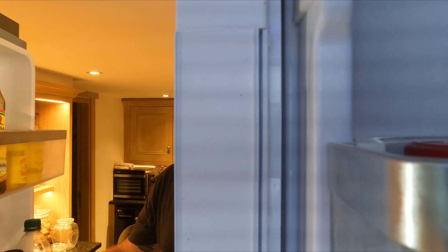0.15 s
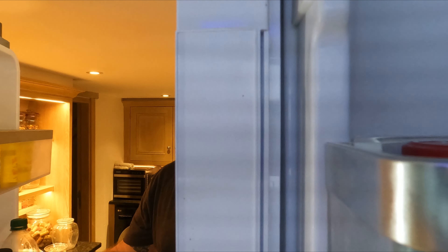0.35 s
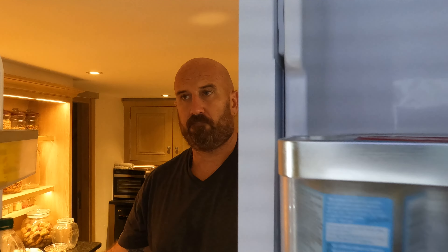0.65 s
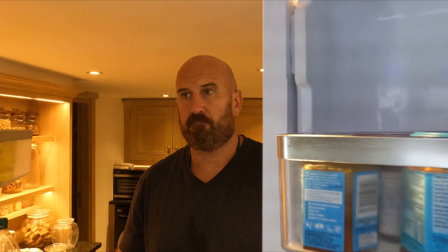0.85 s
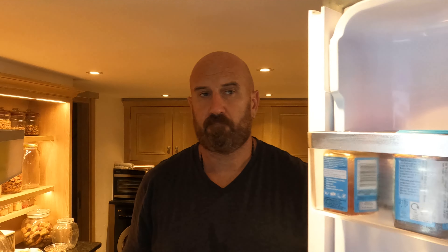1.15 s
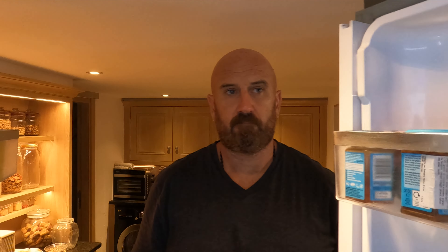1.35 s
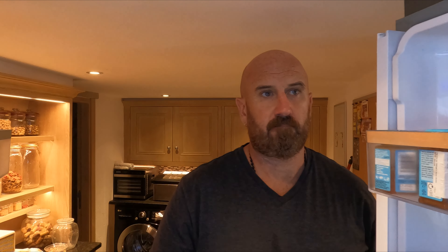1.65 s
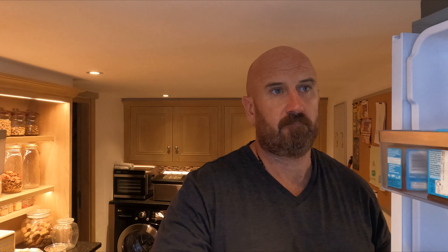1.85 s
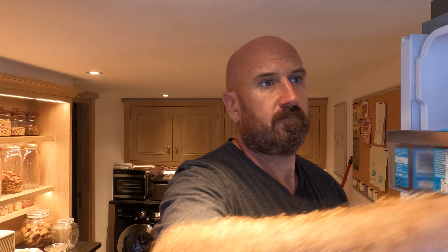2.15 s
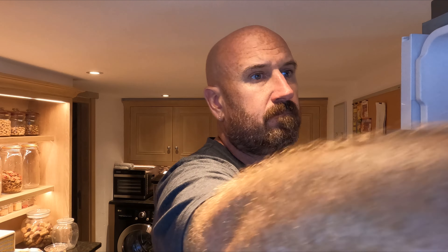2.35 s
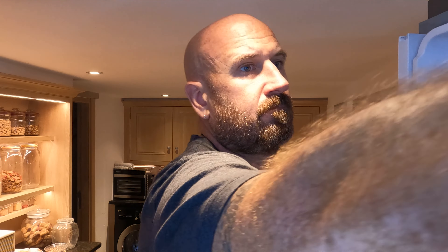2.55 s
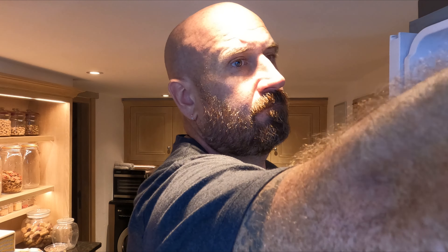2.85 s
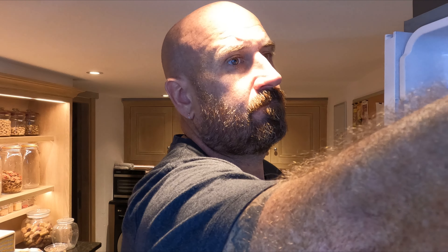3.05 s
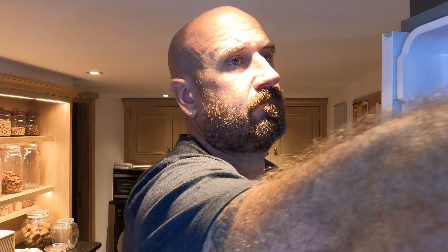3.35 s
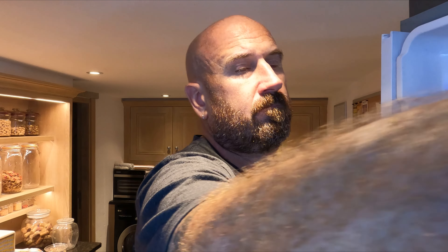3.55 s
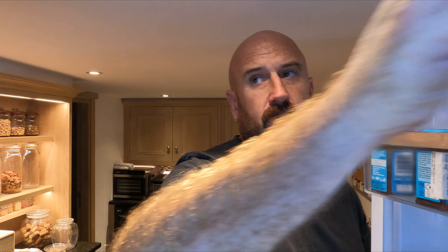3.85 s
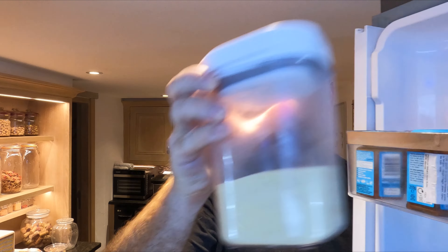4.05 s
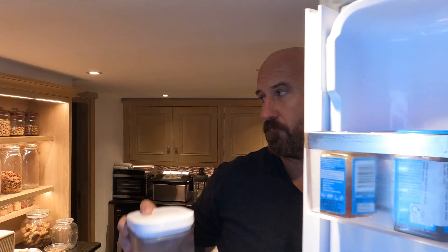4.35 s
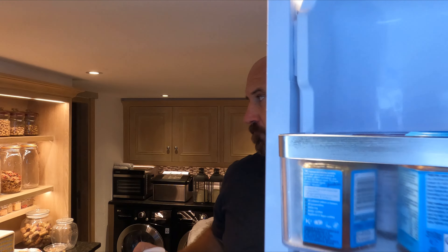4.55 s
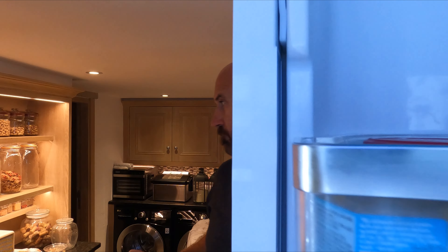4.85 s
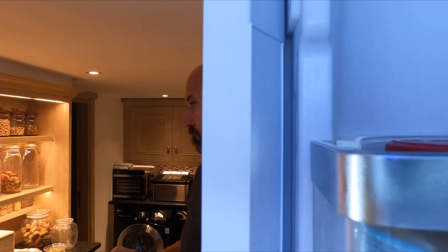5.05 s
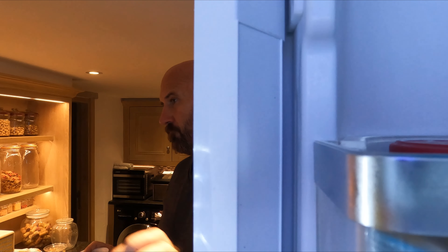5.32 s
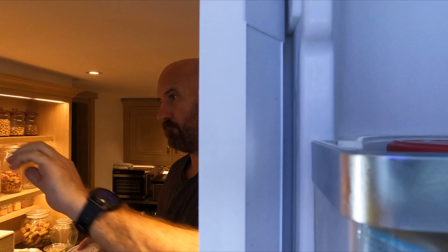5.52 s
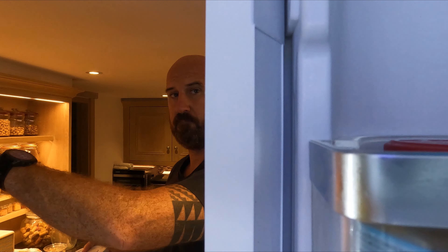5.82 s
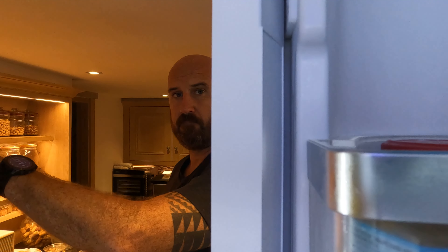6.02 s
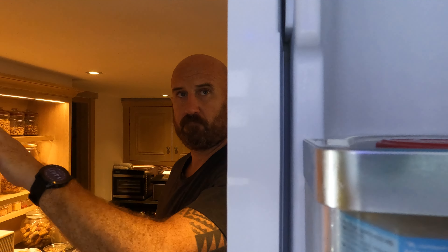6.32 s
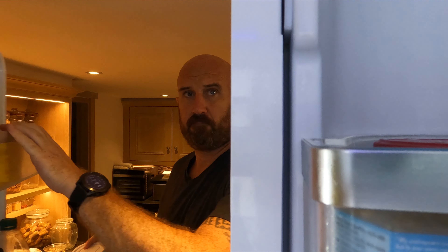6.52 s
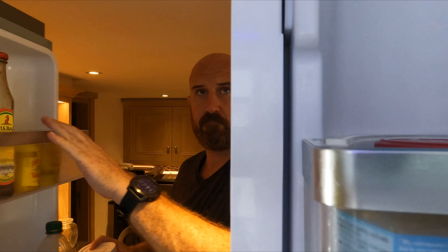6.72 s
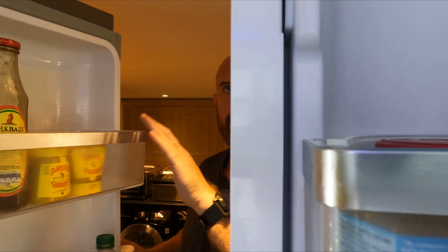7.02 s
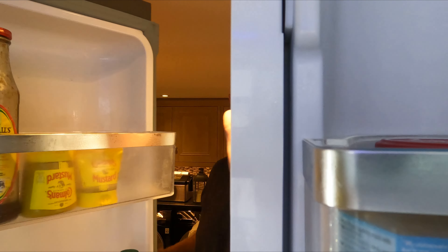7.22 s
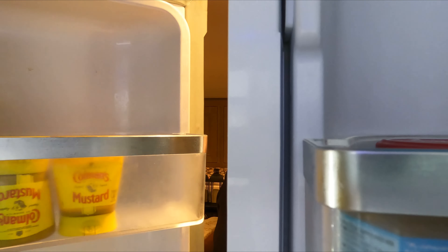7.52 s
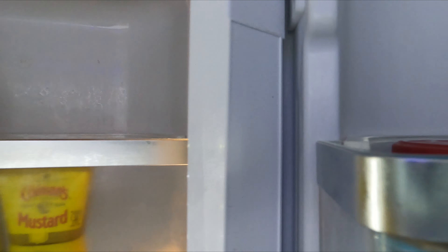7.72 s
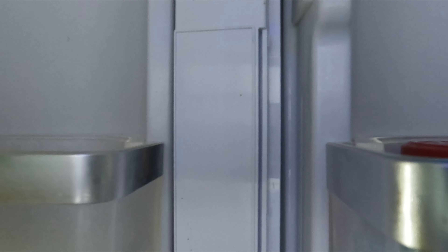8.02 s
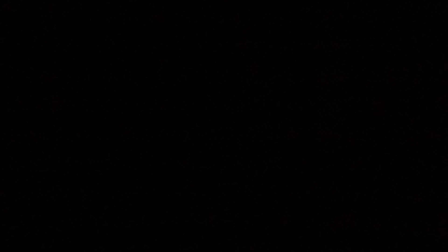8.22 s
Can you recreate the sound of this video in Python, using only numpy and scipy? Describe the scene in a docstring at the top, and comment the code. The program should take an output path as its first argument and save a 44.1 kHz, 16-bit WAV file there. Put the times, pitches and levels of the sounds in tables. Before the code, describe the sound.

Heard from a shelf inside a refrigerator in a home kitchen: seals rip open with a low shudder and sharp snaps, then faint joggling. An arm brushes in, a plastic container knocks, scrapes and thumps hollowly as it is lifted out. One door shuts with a thud and brief creak, jars joggle, then the other door whooshes and slams with rattling cracks over a soft fan murmur.

```python
"""Inside a refrigerator, heard from a shelf: the door seals peel open, an arm reaches in, a plastic tub is
knocked about and lifted out, jars joggle in the door racks and both doors swing shut over a murmuring fan.
Random pushes and contacts ring the modes of the boxed air and shelves; coloured noise makes the rasps, snaps,
cloth and moving air; decaying sines make the clinks and the hinge, steady sines the shudder of the door."""
import sys
import numpy as np
from scipy import signal
from scipy.fft import rfft, irfft, next_fast_len
from scipy.io import wavfile
from scipy.ndimage import uniform_filter1d

SR = 44100
rng = np.random.default_rng(int(sys.argv[2]) if len(sys.argv) > 2 else 0)


def output_pcm(signal):
    """Save a mono or channel-first signal as 16-bit PCM at the path in sys.argv[1].

    Samples are clipped to [-1, 1] before scaling.
    """
    pcm = np.clip(np.atleast_2d(signal).T, -1, 1) * 32767
    wavfile.write(sys.argv[1], SR, np.round(pcm).astype(np.int16))


N = 369558
TIME = np.arange(N) / SR

# Deep modes of the cabinet. Each row: pitch in Hz, level in dB, t60 relative to the ring of the blow.
DEEP_MODES = [(116.9, 1.5, 1.12), (136.8, 3, 1.43), (173.3, 4.5, 1.32), (247.3, -5, 1.13)]
# Modes of the cabinet air and shelves. Each row: pitch in Hz, level in dB, t60 relative to the ring of the blow.
BOX_MODES = [(275.5, -13, 1.8), (360.5, -0.5, 1.52), (391, -5, 1.48), (420.4, -1, 1.03), (464.7, -3, 1.5),
             (531.2, 2.5, 1.05), (614.4, 3.5, 0.52), (661, -6.5, 1.67), (710.6, -3.5, 1.4),
             (793.3, 2, 0.47), (888, -5, 0.83), (1116, -9, 0.46), (1190, -19.5, 0.074), (1455, -24, 0.74)]
# Colour of cracks and rasps. Each row: frequency in Hz, relative level in dB per Hz.
BRIGHT_COLOUR = [(590, -25.5), (1000, -2), (1140, -9), (1320, -11), (2800, -10.5), (4930, -17),
                 (7180, -25.5), (9050, -41.5), (11300, -37), (14100, -70)]


def undb(db):
    """Turns dB into gain."""
    return 10 ** (np.asarray(db) / 20)


def unit(x):
    """Scales x to an RMS of one."""
    return x / np.sqrt(np.mean(x ** 2))


def colour(x, points):
    """Shapes the spectrum of x by (Hz, dB) points."""
    hz, db = np.transpose(points)
    size = next_fast_len(len(x))
    f = np.maximum(np.arange(size // 2 + 1) * SR / size, 1)
    gain = undb(np.interp(np.log(f), np.log(hz), db))
    return irfft(rfft(x, size) * gain, size)[:len(x)]


def tilted(db_an_octave):
    """The bright colour, tipped about 3 kHz."""
    return [(hz, db + db_an_octave * np.log2(hz / 3000)) for hz, db in BRIGHT_COLOUR]


def band(x, lo_hz, hi_hz):
    """Keeps one band of x, at an RMS of one."""
    return unit(signal.sosfilt(signal.butter(2, [lo_hz, hi_hz], "bandpass", fs=SR, output="sos"), x))


def curve(table, column=1, off_db=-120):
    """Gain along one column of dB, smoothed over 5 ms, dropping to off_db outside the table."""
    rows = np.transpose(table)
    gain = undb(np.interp(TIME, rows[0], rows[column], off_db, off_db))
    return uniform_filter1d(gain, size=SR // 200)


def swell(s, db, rise_s, fall_s, held_s=0, droop_db=0):
    """Gain that climbs 30 dB per rise_s to db at s, shifts by droop_db while held, then falls 30 dB per fall_s."""
    corners = np.cumsum([s - 4 * abs(rise_s), 4 * abs(rise_s), abs(held_s) + 1e-4, 4 * abs(fall_s)])
    level_db = np.interp(TIME, corners, db + np.array([-120, 0, droop_db, droop_db - 120]))
    return undb(level_db)


def add(out, s, x, db):
    """Lays x into out from time s with its peak at db."""
    i = int(s * SR)
    x = x[:N - i]
    out[i:i + len(x)] += x * undb(db) / np.max(np.abs(x))


def ring(modes, stretch, spread_db=0, near_hz=None, size=SR // 3, count=1):
    """Blows on decaying sine modes, each woken by chance; those near the pitch of the blow most."""
    hz, db, t60 = np.transpose(modes)
    if near_hz is not None:
        db = db - 9 * np.abs(np.log2(hz / np.reshape(near_hz, (-1, 1))))  # 9 dB weaker per octave away
    t = np.arange(size) / SR
    chance = rng.standard_normal((count, len(modes), 2))
    strength = undb(db + spread_db * chance[..., 0]) * np.sign(chance[..., 1])
    fade = np.exp(-np.log(1000) * t / np.maximum(t60 * stretch, 1e-3)[:, None])
    return np.squeeze(strength @ (fade * np.sin(2 * np.pi * hz[:, None] * t)))


def grains(per_s, spread_db):
    """Sparse random pushes, mostly small, a few larger."""
    chance = rng.random((N, 3)).T
    size_db = spread_db * np.minimum(-np.log(1 - chance[2]), 3)
    return unit((chance[0] < per_s / SR) * np.sign(chance[1] - .5) * undb(size_db))


def grit(per_s, spread_db, rattle_s):
    """Bright noise that jumps with each grain and dies away between the hard walls."""
    jumps = signal.lfilter([1], [1, -np.exp(-1 / (rattle_s * SR))], grains(per_s, spread_db) ** 2)
    return unit(colour(rng.standard_normal(N) * np.sqrt(np.maximum(jumps, 0)), BRIGHT_COLOUR))


def shaken(judder, upper, rumble, bumps_per_s, heaves_per_s, ring_s, boom_s, spread_db, push_s):
    """Ragged random pushes drive the lower and upper modes of the box and its deep modes, which ring on."""
    half = len(BOX_MODES) // 2
    low, high = ring(BOX_MODES[:half], ring_s), ring(BOX_MODES[half:], ring_s)
    deep = ring(DEEP_MODES, boom_s)
    bumps = np.abs(grains(bumps_per_s, spread_db))
    pressure = signal.fftconvolve(bumps, np.hanning(int(push_s * SR)), "same")
    push = unit(pressure * rng.standard_normal(N))
    heave = grains(heaves_per_s, spread_db)
    size = np.linalg.norm(low + high)
    lower_part = signal.fftconvolve(judder * push, low / size)[:N]
    upper_part = signal.fftconvolve(upper * push, high / size)[:N]
    deep_part = signal.fftconvolve(rumble * heave, deep / np.linalg.norm(deep))[:N]
    return lower_part + upper_part + deep_part


def fan():
    """A steady murmur of coloured noise, and a thin hiss of air that comes and goes."""
    # Colour of the murmur. Each row: frequency in Hz, relative level in dB per Hz.
    fan_colour = [(15, -64), (25, -36), (156, -16), (294, -5.5), (426, 15.5), (744, -3.5), (827, 10),
                  (944, -6.5), (1520, -7.5), (4630, -24), (11100, -54), (14100, -60)]
    # Hiss of air. Each row: time in seconds, level in dB before its drift.
    hiss_levels = [(0.0, -65.5), (.8, -73), (1.3, -68), (3.5, -74), (5.6, -69), (6.7, -65.5), (7.19, -61.5),
                   (7.3, -70), (8.38, -74)]
    murmur = undb(-51.5) * unit(colour(rng.standard_normal(N), fan_colour))
    drift_db = 2 * band(rng.standard_normal(N), 2, 8)
    hiss = curve(hiss_levels) * undb(drift_db) * band(rng.standard_normal(N), 4310, 5240)
    return murmur + hiss


def stir():
    """Small things joggling in the racks push on the cabinet all through."""
    # Each row: time in seconds, level of the joggle in dB.
    stir_levels = [(0.0, -50), (0.65, -44.5), (0.85, -55.5), (1.37, -55.5), (2.6, -43.5), (3.29, -47),
                   (4.9, -53), (5.65, -52.5), (6.33, -42.5), (7.19, -48), (7.66, -42), (8.38, -43.5)]
    joggle = curve(stir_levels)
    rumble = joggle ** 0.58 * undb(-20.5)  # the rumble swells less than the joggle
    return shaken(joggle, joggle, rumble, bumps_per_s=100, heaves_per_s=70,
                  ring_s=0.15, boom_s=0.13, spread_db=3.0, push_s=0.0058)


def rustle():
    """Brushing of sleeve and skin as gritty noise, and brighter airy swishes of cloth that swell and fade."""
    # Brushing. Each row: time in seconds, level in dB.
    brush_levels = [(0.0, -59), (0.35, -58.5), (0.8, -71), (1.64, -59.5), (2.18, -51), (2.65, -48),
                    (2.69, -56.5), (3.15, -61), (4.24, -66), (5.61, -64), (6.2, -54), (7.2, -59.5),
                    (7.75, -48.5), (8.1, -54), (8.38, -64)]
    # Swishes. Each row: middle in seconds, level in dB, half length in seconds.
    swishes = [(2.008, -46.5, 0.036), (3.396, -56, 0.048), (4.387, -60.5, 0.066), ]
    gust = sum(undb(db) * np.exp(-.5 * ((TIME - s) / half) ** 2) for s, db, half in swishes)
    swish = unit(colour(rng.standard_normal(N), tilted(8)))
    return curve(brush_levels) * band(grit(920, 0.77, 0.0059), 930, 12000) + gust * swish


def scrapes():
    """Peeling door seals and heavy scrapes swell, peak and fade, shaking the cabinet."""
    # Each row: peak in seconds, judder in dB, swell and fade in seconds per 30 dB,
    # rumble in dB re judder, upper modes in dB re judder.
    scrape_rows = [(.594, -16, 0.28, 0.23, -14.5, -1.5), (.71, -29.5, 0.17, 0.091, -18, 8.5),
                   (2.655, -21, 0.028, 0.16, 5.5, -2.5), (2.93, -22.5, 0.18, 0.13, -4, -7.5),
                   (3.09, -10.5, 0.096, 0.055, -2, -1), (3.78, -37, 0.044, 0.8, 6.5, -11),
                   (4.893, -29.5, 0.047, 0.099, -16, 2), (5.025, -16.5, 0.026, 0.2, -18, -2.5),
                   (6.42, -32.5, 0.42, .4, -8, -9.5), (7.77, -21.5, 0.14, 0.2, -21, -8.5),
                   (7.905, -12, 0.11, 0.23, -18.5, 0.5)]
    gains = np.array([swell(*row[:4]) for row in scrape_rows])
    rumble_db, upper_db = np.transpose(scrape_rows)[-2:]
    return shaken(sum(gains), undb(upper_db) @ gains, undb(rumble_db) @ gains, bumps_per_s=450,
                  heaves_per_s=450, ring_s=0.078, boom_s=0.064, spread_db=3.5, push_s=.0003)


def air_pump():
    """Doors and heavy blows pump the air: low noise that swells and fades."""
    # Each row: peak in seconds, level in dB, swell and fade in seconds per 30 dB.
    pumps = [(.62, -22, 0.18), (2.71, -51, 0.17), (3.1, -48, .15), (3.8, -48, 0.17), (5.05, -28, 0.22),
             (6.56, -49, 1), (6.91, -43, 0.098), (7.89, -16.5, 0.12), (7.4, -56, 0.99), (8.36, -38.5, 0.5)]
    gain = sum(swell(s, db, half_s, half_s) for s, db, half_s in pumps)
    return gain * band(rng.standard_normal(N), 41, 80)


def knocks():
    """A soft, ragged contact rings the box, hard at first, then with a low tail; the deep modes answer late."""
    # Knocks on shelves and doors. Each row: time in seconds, peak of the hard ring in dB,
    # thud in dB re that peak, pitch in Hz about which the modes wake most.
    knock_rows = [(0.251, -18.5, -10.5, 516), (0.497, -6, -35, 640), (0.518, -8, -15, 533),
                  (0.572, -15, -7, 538), (0.589, -12.5, -31, 357), (0.722, -13.5, -35, 800),
                  (0.75, -20.5, -32, 764), (0.908, -34, -12, 442), (0.96, -34, -5, 400),
                  (1.014, -23, -35, 453), (1.159, -31.5, -5, 356), (1.365, -38, -5, 420),
                  (1.42, -35, -0.5, 430), (1.826, -33, -7, 422), (1.895, -36, 1.5, 450),
                  (2.03, -34, -9, 396), (2.097, -30, -2.5, 468), (2.301, -32, -3, 467),
                  (2.657, -6, -8, 356), (2.707, -10, -1, 397), (2.83, -4.5, -40, 600),
                  (2.905, -6, -12, 428), (3.044, -12.5, -8, 417), (3.078, -7.5, -13.5, 641),
                  (3.094, -8.5, -4.5, 640), (3.308, -18, -10.5, 376), (3.412, -29.5, -19, 540),
                  (3.567, -30.5, -28, 458), (3.738, -18, -11, 494), (3.749, -2.5, -15, 480),
                  (3.926, -13.5, -17, 495), (4.016, -19.5, -22, 415), (4.253, -30.5, -15, 351),
                  (4.385, -29, -19, 410), (4.457, -31, -5.5, 358), (4.569, -24, -8.5, 408),
                  (4.887, -21, -24, 541), (4.922, -15.5, -13, 393), (5.025, -7.5, -13.5, 357),
                  (5.057, -12, -21, 720), (5.088, -15, -6, 430), (5.501, -32, 4, 393),
                  (5.856, -31.5, -2, 453), (5.945, -11, -41, 550), (6.027, -17.5, -18, 530),
                  (6.155, -26, -25, 382), (6.233, -24, -26, 358), (6.456, -14.5, -12.5, 392),
                  (6.562, -19.5, -41, 510), (6.63, -15.5, -32, 513), (6.725, -32, -9, 468),
                  (6.775, -30, -3, 373), (6.884, -20.5, -29, 400), (6.972, -28, -1, 530),
                  (7.035, -32.5, 4, 448), (7.335, -30.5, 0, 461), (7.819, -12, -20, 800),
                  (7.87, -6, -21, 534), (7.901, -16, -31, 358), (7.964, -9, -9.5, 624),
                  (8.097, -20, -24, 730), (8.131, -19, -16, 458), (8.212, -27.5, -22, 390),
                  (8.27, -23, -30, 560), (8.324, -10, -18, 507)]
    _, peak_db, _, near_hz = np.transpose(knock_rows)
    out, t, blows = np.zeros(N), np.arange(SR // 20) / SR, len(knock_rows)
    contact_s, softer_per_db = 0.001199, .04  # contact at 0 dB and 600 Hz; weaker blows stay longer
    touch_s = contact_s * np.exp(-softer_per_db * peak_db)[:, None]
    touch_s = touch_s * (600 / near_hz[:, None]) ** 1.203  # so do lower-pitched ones
    soft = signal.butter(2, 1600, fs=SR, output="sos")
    contact = signal.sosfilt(soft, rng.standard_normal((blows, len(t))) * t * np.exp(-t / touch_s))
    hard = ring(BOX_MODES, 0.059, spread_db=1.0, near_hz=near_hz, size=SR // 6, count=blows)
    tail = ring(BOX_MODES, 0.22, spread_db=4.0, near_hz=0.78 * near_hz, count=blows)
    deep = ring(DEEP_MODES, 0.18, spread_db=3.0, count=blows)
    hard, tail = (signal.fftconvolve(x, contact, axes=1) for x in (hard, tail))
    deep = signal.fftconvolve(deep, np.hanning(SR // 300)[None], axes=1)
    for k, (s, db, thud_db, _) in enumerate(knock_rows):
        add(out, s - 1.299 * touch_s[k, 0], hard[k], db)  # starts early, as the contact takes time to build
        add(out, s + 0.004084, tail[k], db - 11.5)
        add(out, s + 0.0027, deep[k], db + thud_db)
    return out


def rasps():
    """Rubber seals and sliding plastic rasp: gritty noise bites, holds and lets go; tight ones lose their body."""
    # Each row: start of the hold in seconds, hold in seconds, level in dB, level change while held in dB,
    # gain in dB of the part under 2 kHz.
    rasp_rows = [(0.394, 0.086, -38.5, 2.5, -3.5), (.497, 0.056, -27.5, -13, 4.5),
                 (0.584, 0.22, -26, -24, 1.5), (2.827, 0.097, -38, -11, -1.5), (4.875, 0.071, -45, 1, -4),
                 (5.028, 0.074, -37.5, -8, 1), (5.123, 0.13, -41, -11, -7), (5.95, 0.12, -38.5, -16, 7),
                 (7.729, 0.021, -35, -1.5, -0.5), (7.78, 0.033, -24.5, -2, -27), (7.853, 0.014, -38, 8, -7),
                 (7.871, 0.13, -22.5, -5.5, 2.5), (8.047, 0.025, -43, -9, 5)]
    attack_s, release_s = 0.018, 0.049  # per 30 dB
    noise = grit(600, 4.2, 0.0035)
    body = signal.sosfiltfilt(signal.butter(2, 2000, fs=SR, output="sos"), noise)
    edge_gain, body_gain = np.zeros(N), np.zeros(N)
    for s, held_s, db, droop_db, body_db in rasp_rows:
        gain = swell(s, db, attack_s, release_s, held_s, droop_db)
        edge_gain += gain
        body_gain += gain * undb(body_db)
    return edge_gain * (noise - body) + body_gain * body


def shudders():
    """The swinging door shudders on one low note, a sine that swells while it moves and stops with it."""
    # Each row: start of the hold in seconds, hold in seconds, pitch in Hz, level in dB before a 6 dB cut.
    shudder_rows = [(.53, 0.041, 103, -21), (7.75, .11, 111.5, -24)]
    out = np.zeros(N)
    for s, held_s, hz, db in shudder_rows:
        gain = swell(s, db - 6.0, 0.046, .04, held_s, droop_db=5.3)  # grows while held
        out += gain * np.sin(2 * np.pi * hz * TIME)
    return out


def snaps():
    """Hard edges snap as they touch: a tick, a crack and its duller rattling tail, all of bright noise."""
    # Each row: time in seconds, peak in dB, tilt of the crack in dB an octave.
    snap_rows = [(0.395, -27, 2), (0.4253, -21, 4), (0.4949, -19, -1), (0.5194, -23.5, 11), (0.555, -20, 3),
                 (0.5736, -9.5, 4.5), (0.59, -12.5, 2.5), (0.614, -11, 0), (0.6535, -15.5, 0),
                 (0.683, -21, -1), (0.721, -25, -16), (2.6544, -34.5, 13), (2.832, -12.5, -9),
                 (2.8823, -28, 7.5), (2.916, -25, -16), (3.048, -20, 0.5), (3.0782, -16, -7.5),
                 (3.484, -40, 5), (3.7474, -10, -6), (3.7559, -17.5, 0), (3.926, -24, -17),
                 (4.015, -32, -21), (4.246, -41.5, -1), (4.566, -32.5, -2), (4.88, -28, 0),
                 (4.9302, -21, 1.5), (5.0254, -11, 2.5), (5.0774, -21, 5.5), (5.9418, -15.5, -0.5),
                 (6.0232, -26.5, -2.5), (6.2338, -32.5, 7), (6.2805, -30.5, 5), (6.453, -23.5, -1),
                 (6.5584, -28.5, -1), (6.628, -24, -8.5), (6.8798, -24, 5), (7.341, -31.5, -0.6),
                 (7.7367, -22.5, -5), (7.819, -17, -23), (7.865, -22, 10), (7.897, -7.5, -3),
                 (7.9647, -12, -2.5), (8.048, -28.5, 8.5), (8.097, -25.5, -3.5), (8.1314, -23, 0),
                 (8.2707, -28.5, -0.5), (8.323, -8.5, 2.5)]
    out, t = np.zeros(N), np.arange(SR // 8) / SR
    tail_t60_s = 0.1
    for s, db, tilt_db in snap_rows:
        burst = undb(6.0) * np.exp(-t / 0.00081) + np.exp(-t / 0.0076)  # tick, then crack
        crack = burst * unit(colour(rng.standard_normal(len(t)), tilted(tilt_db)))
        dull = unit(colour(rng.standard_normal(len(t)), tilted(tilt_db - 3.0)))
        tail = np.exp(-np.log(1000) * t / tail_t60_s) * dull
        onset = 1 - np.exp(-t / 0.00038)
        add(out, s, onset * (crack + undb(-3) * tail), db)
    return out


def clinks():
    """Glass and hard plastic touch and ring a brief note with one weaker overtone."""
    # Each row: time in seconds, peak in dB, pitch in Hz, t60 in seconds before shortening to 0.72 of it.
    clink_rows = [(.63, -40, 6560, 0.072), (.765, -61, 6500, 0.16), (2.539, -39.5, 4070, 0.11),
                  (2.832, -21, 3830, 0.042), (2.878, -36, 3870, 0.092), (2.886, -41, 5700, .06),
                  (6.283, -34.5, 3370, 0.06), (6.455, -23, 1810, 0.036), (8.27, -29, 1840, 0.024)]
    out = np.zeros(N)
    for s, db, hz, t60 in clink_rows:
        note = [(hz, 0, t60), (1.64 * hz, -8, .5 * t60)]
        add(out, s, ring(note, 0.72, size=SR // 8), db)
    return out


def creak():
    """A hinge slips in slowing steps; every slip rings the same modes and leaves a wisp of chatter."""
    # Runs of slips. Each row: first and last slip in seconds, gap in seconds, peak in dB, before scatter.
    slips = [(5.1215, 5.163, .0069, -28), (5.1696, 5.1964, .0134, -28), (5.227, 5.227, .03, -25)]
    # Modes of the hinge. Each row: pitch in Hz, level in dB, t60 in seconds.
    hinge_modes = [(2040, -7, 0.018), (3080, -0.5, 0.018), (3480, 0, 0.016), (4130, -7, 0.027),
                   (5060, -8, 0.012), (6230, -1.5, 0.013), (7340, -14.5, 0.0069)]
    jitter_s, scatter_db = .0003, 1.2
    out, t = np.zeros(N), np.arange(SR // 100) / SR
    hinge = ring(hinge_modes, 1, size=SR // 30)
    for first, last, gap, db in slips:
        for s in np.arange(first, max(first, last) + gap / 2, gap):
            chatter = .12 * rng.standard_normal(len(t)) * np.exp(-t / .002)
            chatter[0] = 1  # the slip itself
            late, strong = rng.standard_normal(size=2)
            add(out, s + jitter_s * late, signal.fftconvolve(hinge, chatter), db + scatter_db * strong)
    return out


def whoosh():
    """The closing door gap whooshes: a narrow band of noise whose pitch climbs as the gap narrows."""
    # Each row: time in seconds, centre in Hz, level in dB.
    gap_rows = [(7.36, 900, -60), (7.5, 1050, -50.5), (7.72, 1168, -43), (7.76, 1190, -70)]
    times, centres, _ = np.transpose(gap_rows)
    hz = np.interp(TIME, times, centres)
    wander = band(rng.standard_normal(N), 16, 130)  # slow noise spreads the tone into a band
    tone = np.sqrt(2) * np.sin(2 * np.pi * np.cumsum(hz) / SR)
    return curve(gap_rows, column=2) * wander * tone


def scene():
    """Mixes the ringing cabinet with the seals, contacts, cloth, moving air and fan."""
    cabinet = stir() + scrapes() + knocks() + shudders()
    # the small box carries little below its lowest mode
    cabinet = signal.sosfilt(signal.butter(3, 85, "highpass", fs=SR, output="sos"), cabinet)
    seals = rasps() + creak()
    contacts = snaps() + clinks()
    air = air_pump() + whoosh()
    return (cabinet + contacts + seals + rustle() + air + fan())[None]


def record(dry):
    """The input drops the deepest bass, rounds off the loudest peaks and cuts the top."""
    ceiling, top_hz = .76, 14250  # ceiling in full scale
    x = signal.sosfilt(signal.butter(2, 30, "highpass", fs=SR, output="sos"), dry)
    x = x / (1 + (x / ceiling) ** 4) ** .25
    return signal.sosfilt(signal.ellip(8, .2, 70, top_hz, fs=SR, output="sos"), x)


dry = scene()
out = record(dry)
output_pcm(out)
```